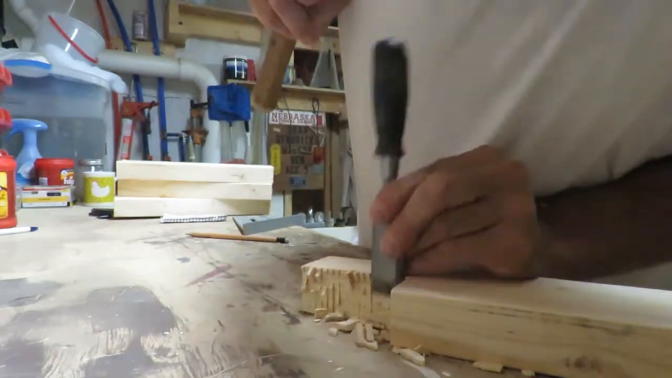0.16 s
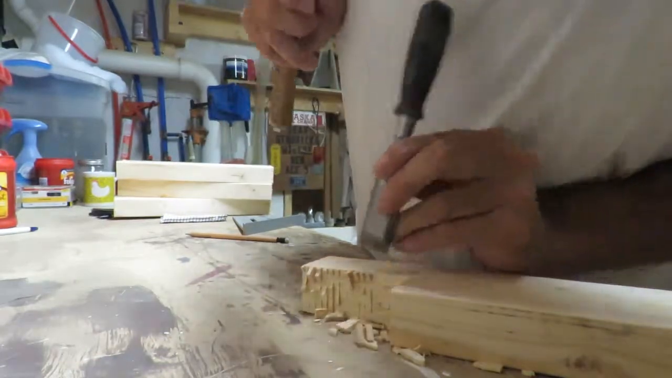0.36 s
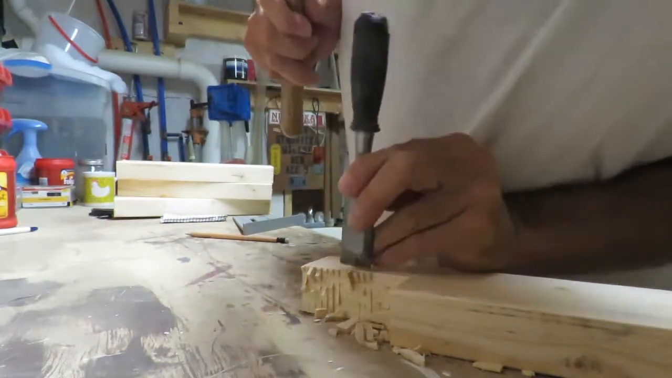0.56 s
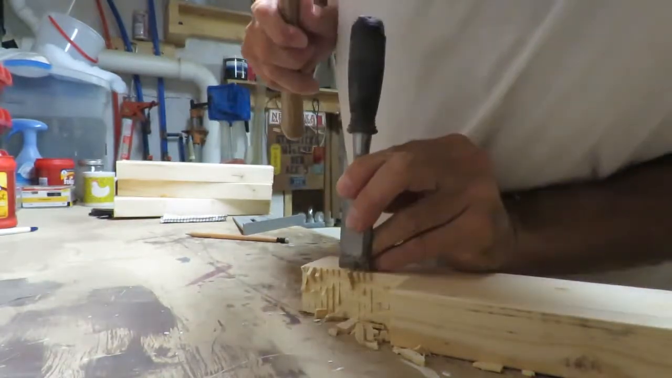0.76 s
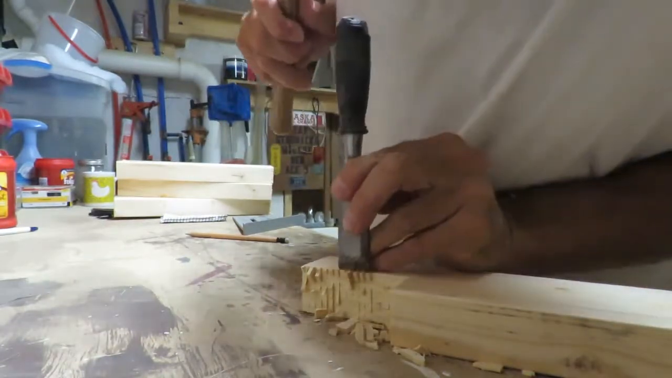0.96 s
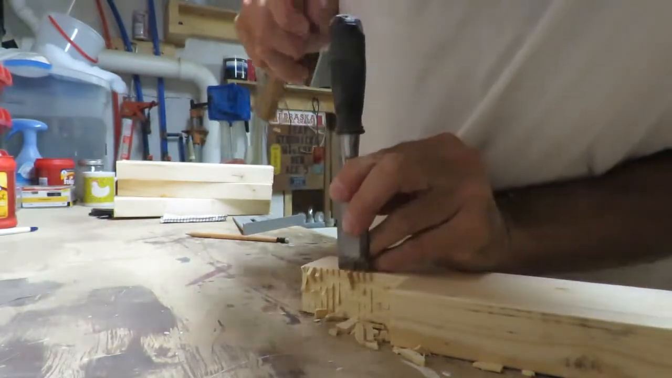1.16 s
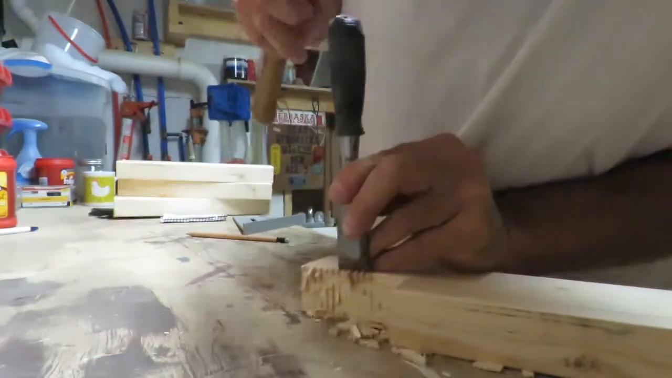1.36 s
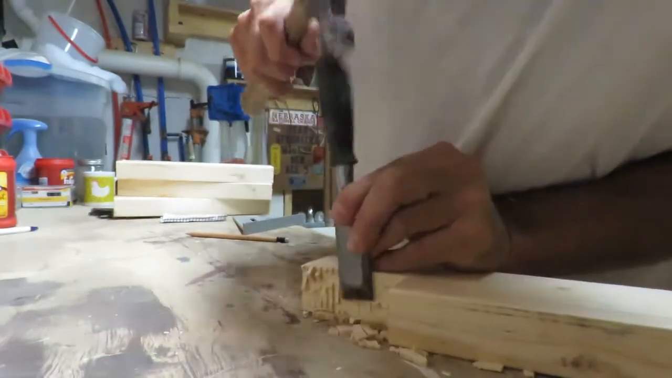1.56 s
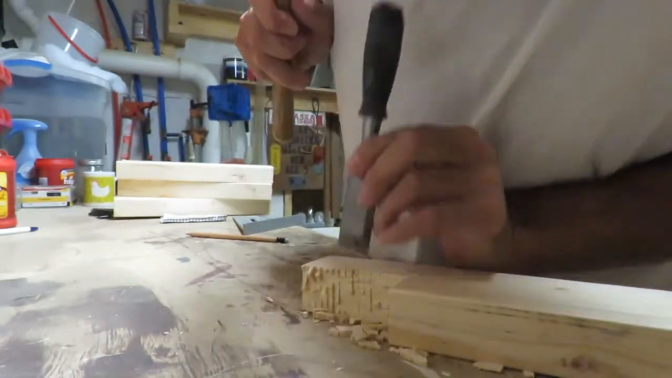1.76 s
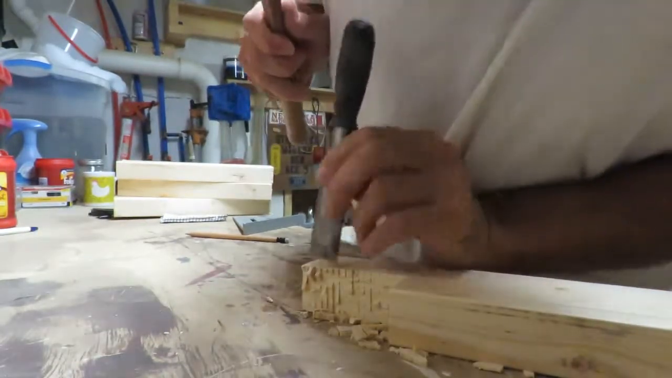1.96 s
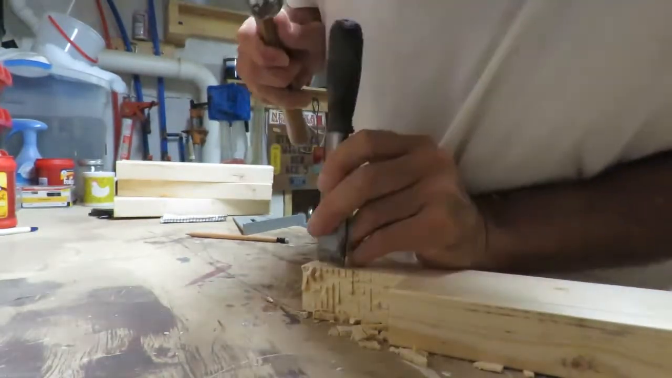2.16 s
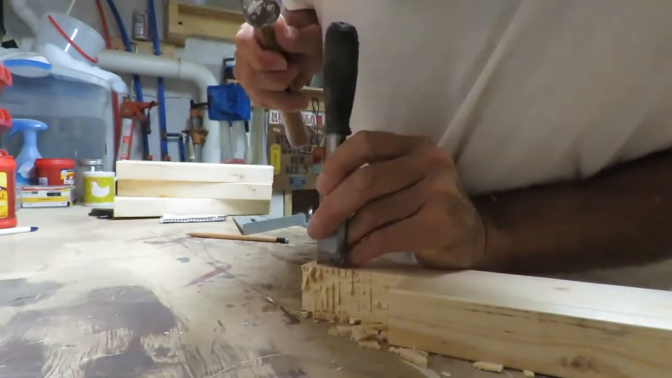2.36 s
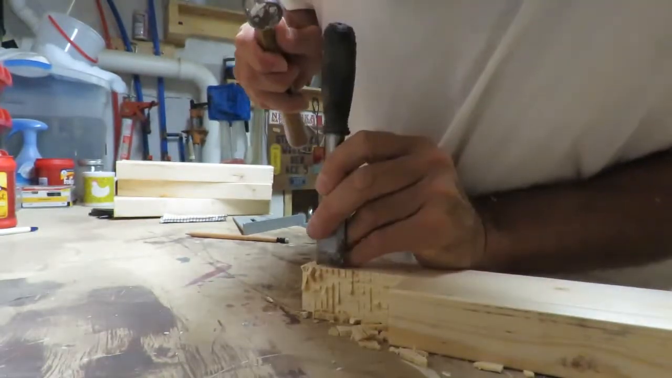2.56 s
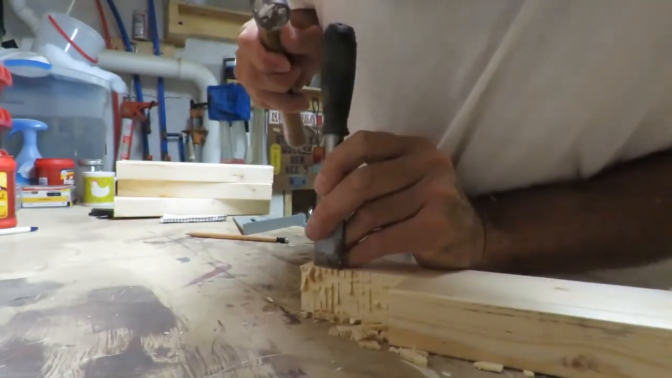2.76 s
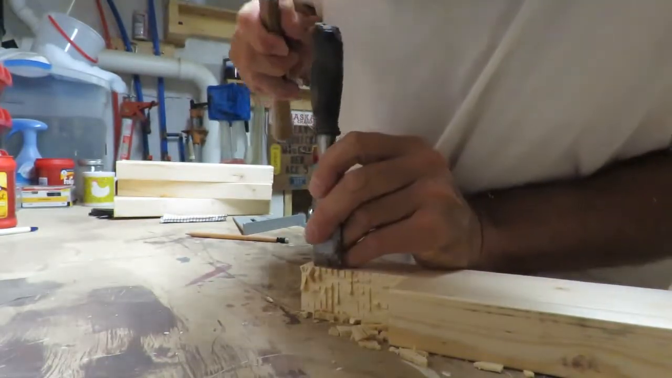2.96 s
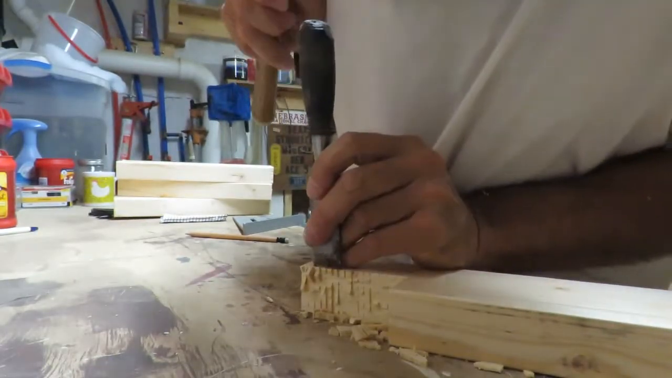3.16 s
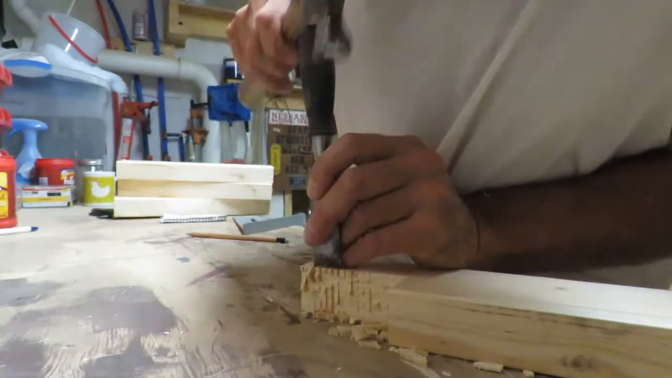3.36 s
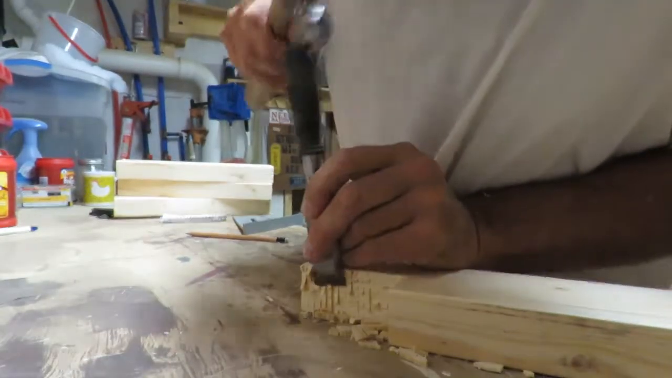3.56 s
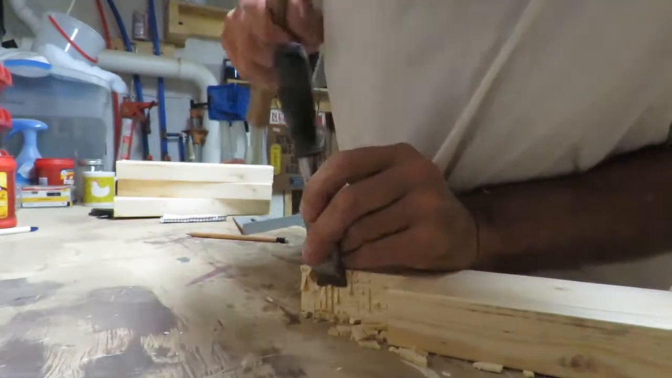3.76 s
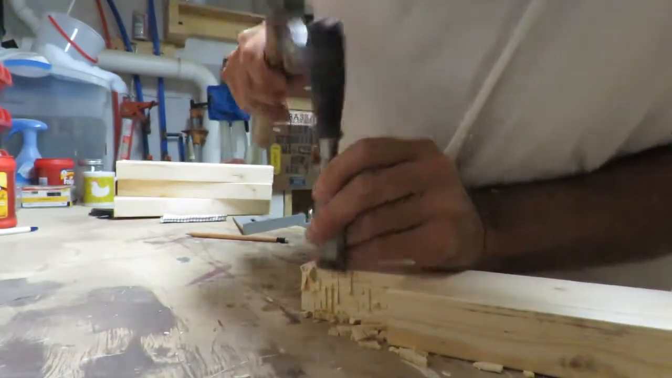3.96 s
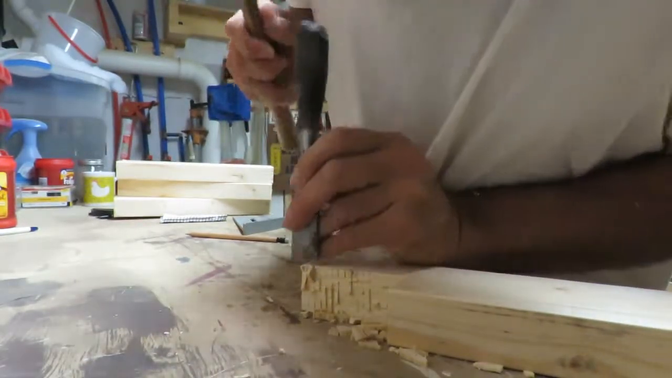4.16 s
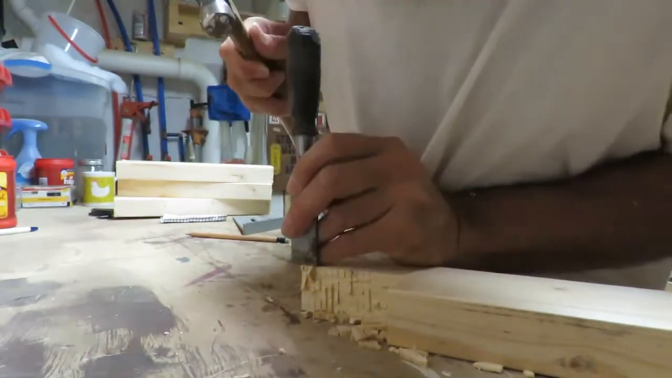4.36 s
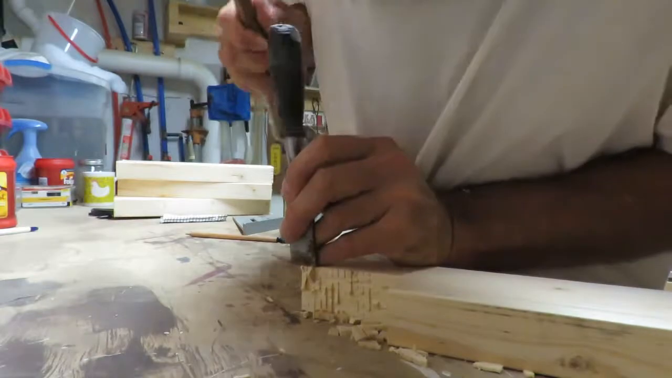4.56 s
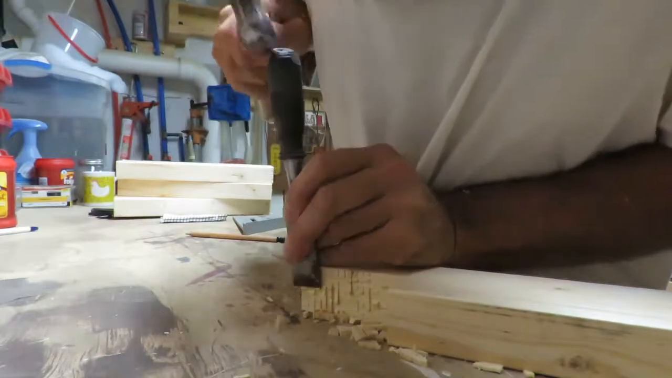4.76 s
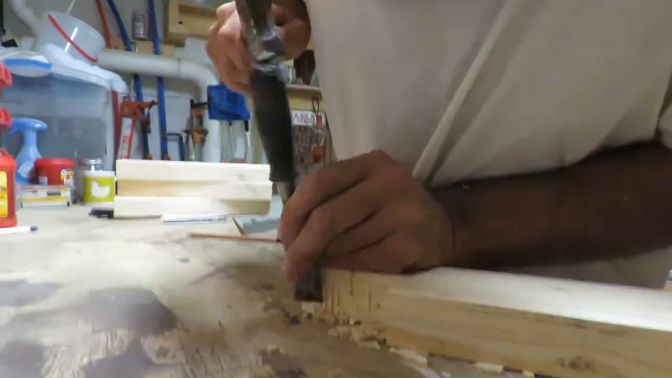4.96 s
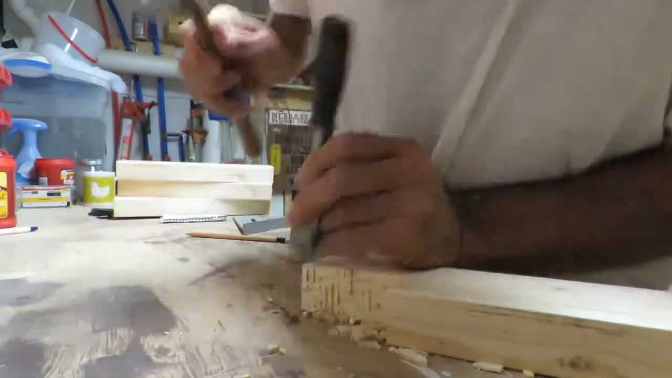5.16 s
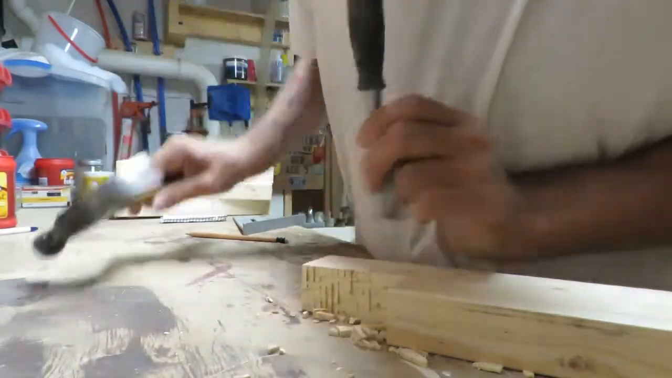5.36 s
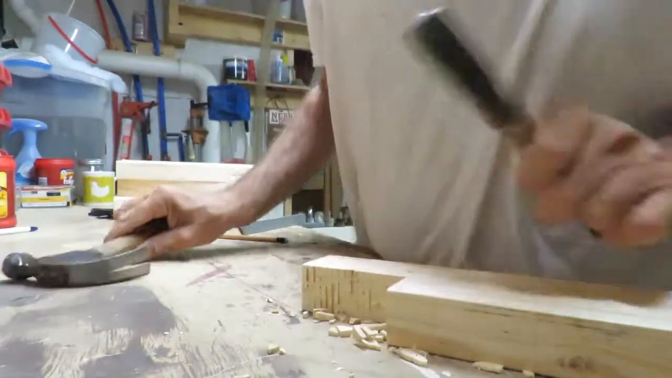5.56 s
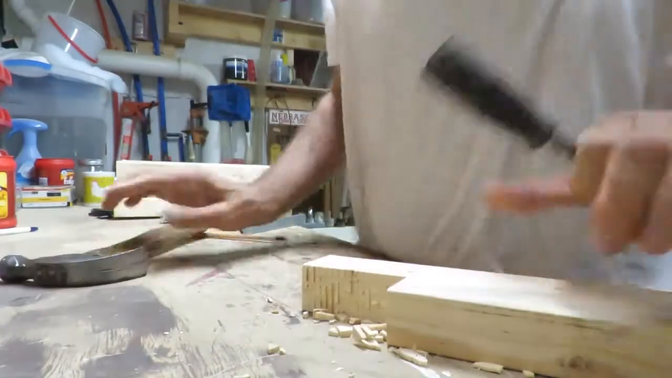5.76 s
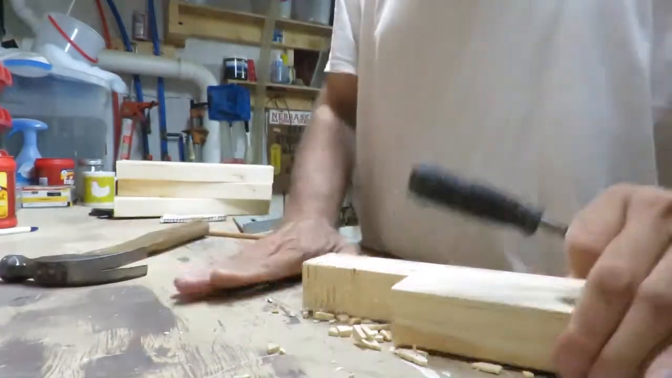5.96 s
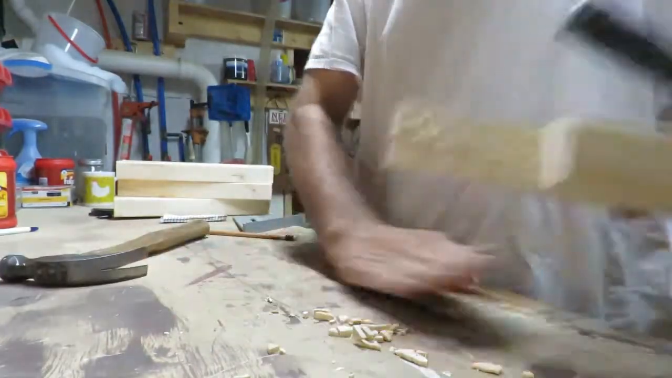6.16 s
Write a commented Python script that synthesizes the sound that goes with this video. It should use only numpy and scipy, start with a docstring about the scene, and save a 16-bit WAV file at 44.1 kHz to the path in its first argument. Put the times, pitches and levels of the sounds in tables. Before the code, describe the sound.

Close up in a small workshop with a steady low rumble, a chisel is hammered into wood in short, irregular groups. Each hit is a dry knock that mixes a bench thud, a steel click and cracking fibres, with soft bumps in the gaps as the blade is reset. Near the end the hammer is laid down and rocks to rest, followed by a few wooden knocks as the board is pushed and lifted.

```python
"""At a workshop bench, a hammer drives a chisel into a board, close to a pair of microphones.
Each impact excites the damped modes of bench, board and blade, while crushed and splintering fibres
add bursts of noise. At the end the hammer is laid down and the loose board is knocked about.
Short reflections, a rustle of arms and the room's rumble surround the work; an automatic gain control
ducks everything after loud blows and lets the rumble swell back."""
import sys
import numpy as np
from scipy import signal
from scipy.fft import rfft, irfft, next_fast_len
from scipy.io import wavfile
from scipy.ndimage import uniform_filter1d, minimum_filter1d

SR = 44100
rng = np.random.default_rng(int(sys.argv[2]) if len(sys.argv) > 2 else 0)


def wrap_up_sound(samples):
    """Save the sound to the file named by the first command line argument, as 16-bit audio."""
    columns = np.atleast_2d(samples).T
    # keep every value between -1 and 1, then stretch to whole-number steps
    tamed = np.clip(columns, -1, 1)
    steps = np.round(tamed * 32767).astype(np.int16)
    wavfile.write(sys.argv[1], SR, steps)


N = 277653
LEAD = 300  # samples before each contact


def contact(level_db, frame_db, steel_db, splinter_db, chatter_s, blade_hz, board_hz,
            focus_db, crunch_db, top_db):
    """Impact excitation: an impulse, uneven slips and grinding drive bench, board and blade."""
    t = (np.arange(8000) - LEAD) / SR
    fading = np.exp(-np.maximum(t, 0) / chatter_s) * (t > 0)
    slips = .5 * rng.standard_normal(len(t)) * (rng.random(len(t)) < 2500 / SR) * fading
    grind = gain_of(-28 - 60 * abs(t) / .11) * rng.standard_normal(len(t)) * (t > 0)
    knock = slips + (t == 0)
    push = knock + .12 * grind
    crack = gain_of(splinter_db) * splinters(t, knock, tilt_db=min(-16.5 + .3 * splinter_db, 0))
    lightness = 1 / (1 + gain_of(2 * (frame_db + 7.5)))  # light contacts favour higher bench modes
    bench = bench_thud(.4 * slips + (t == 0), frame_db, top_db, spot_hz=275 * (1 + .47 * lightness))
    board = board_ring(push, board_hz) + gain_of(crunch_db) * crunch(t, grind, slips)
    steel = gain_of(steel_db) * (blade_ring(push, blade_hz, focus_db) + crack)
    return gain_of(level_db) * (bench + board + steel)


def bench_thud(push, frame_db, top_db, spot_hz):
    """Radiation by acceleration: the top sounds as its change of speed; the frame swings back later."""
    # Modes of frame and top. Each row: frequency in Hz, relative level in dB, 60 dB decay time in seconds.
    frame_modes = [(117.7, -19, 0.01), (157.3, 1, 0.094), (180.8, 0.5, 0.086)]
    top_modes = [(213, -7, 0.049), (275, -4, 0.042), (328.5, -9, 0.027), (408.3, -15.5, 0.039)]
    shove = np.diff(softened(np.roll(push, 30), .00055), prepend=0)
    swing = -softened(np.roll(push, 110), .0001)
    frame = ring(frame_modes, swing, spot_hz=146, focus_db=4.5, vary_db=5.5, detune=.019)
    top = ring(top_modes, shove, spot_hz, focus_db=12, vary_db=3, detune=.0034)
    return gain_of(frame_db) * frame + gain_of(top_db) * top


def board_ring(push, spot_hz):
    """Mode splitting: uneven wood turns each resonance into three close partials."""
    # Each row: frequency in Hz, relative level in dB, 60 dB decay time in seconds.
    modes = [(500, -1, .028), (580, -5, .022), (665, -5, .022), (760, -2, .022), (850, -3, .022),
             (935, -1, .022), (1050, -2, .022), (1205, -4, .02), (1350, -5, .018)]
    return ring(modes, softened(push, .000041), spot_hz, focus_db=11.5, vary_db=2, detune=.047, count=3)


def blade_ring(push, spot_hz, focus_db):
    """Damping: the hand on the blade shortens the ring of its steel modes."""
    # Each row: frequency in Hz, relative level in dB, ungripped 60 dB decay time in seconds.
    modes = [(1490, -2, .016), (1620, -2, .016), (1770, -2, .02), (1950, -4, .018), (2083, -1, .024),
             (2250, -1, .022), (2500, -5, .015), (2770, -8, .013), (3112, -8, .014), (3400, -9, .012),
             (3700, -5, .015), (4200, -6, .012), (4600, -6, .016), (5200, -9, .012)]
    gripped = np.multiply(modes, [1, 1, .94])
    force = softened(push, .00005)
    return ring(gripped, force, spot_hz, max(focus_db, 0), vary_db=4, detune=.032, count=3)


def crunch(t, grind, slips):
    """Direct radiation: fibres crushed by the edge give off mid-range noise."""
    # Each row: frequency in Hz, gain in dB.
    spectrum = [(200, -24), (450, -1), (800, 9), (1400, 12), (2500, 3.5), (4500, -11), (7000, -21.5),
                (16000, -45)]
    envelope = gain_of(-60 * abs(t)) * np.clip(t / .0056, 0, 1)
    return colour(grind * envelope + .076 * slips, spectrum)


def splinters(t, knock, tilt_db):
    """Fracture noise: a quick break, then fibres tearing; heavy splintering is tilted less."""
    # Each row: frequency in Hz, relative gain in dB before the tilt of tilt_db per octave.
    spectrum = [(4000, -22.5), (5500, -12.5), (8000, -11), (11000, -13.5), (13500, -14), (16000, -40.5)]
    burst = gain_of(-60 * abs(t) / .022) + gain_of(-13.5 - 60 * abs(t) / .074)
    onset = 1 - np.exp(-np.maximum(t, 0) / .0029)
    fibres = .093 * rng.standard_normal(len(t)) * burst * onset
    tilted = [(hz, db + tilt_db * np.log2(hz)) for hz, db in spectrum]
    return peaked(colour(.045 * knock + fibres, tilted))


def snap(db, tilt_db, length_s, fizz_db):
    """Broadband transient: steel bites or wood snaps in a burst of noise, then splinters fizz."""
    t = (np.arange(6000) - LEAD) / SR
    pulse = np.exp(-(4 * t / length_s - 2) ** 2)
    fizz = gain_of(fizz_db - 60 * t / .27) * np.clip(t / .0042, 0, 1)
    burst = rng.standard_normal(len(t)) * (pulse + fizz)
    spectrum = [(700, -3 * tilt_db - 12), (2000, -2 * tilt_db), (16000, tilt_db)]
    return gain_of(db) * peaked(colour(burst, spectrum))


def ping(db, hz, t60, slide):
    """Damped oscillation: one faint high partial sinks in pitch as it dies."""
    t = np.arange(5000) / SR
    envelope = gain_of(db - 60 * t / t60) * (1 - np.exp(-t / .0022))
    return envelope * np.sin(2 * np.pi * hz * t * (1 - slide * t))


def ring(modes, push, spot_hz, focus_db, vary_db, detune, count=1):
    """Modal superposition: a force rings decaying sines, focus_db weaker per octave from spot_hz."""
    t = np.arange(len(push) // 2) / SR
    hz, db, t60 = np.repeat(np.transpose(modes), count, axis=1)[:, :, None]
    db = db - focus_db * abs(np.log2(hz / spot_hz)) + vary_db * rng.standard_normal(hz.shape)
    hz = hz * (1 + detune * rng.standard_normal(hz.shape))
    # Neighbouring groups of partials swing in opposite sense.
    sense = (-1.) ** (np.arange(len(hz))[:, None] // count) if count > 1 else 1
    response = (sense * gain_of(db - 60 * t / t60) * np.sin(2 * np.pi * hz * t)).sum(0)
    response *= np.hanning(2 * len(t))[len(t):]
    return peaked(signal.fftconvolve(push, response)[:len(push)])


def softened(push, contact_s):
    """Contact compliance: wood gives, spreading the force in time and dulling its treble."""
    u = np.arange(-LEAD // 2, LEAD // 2) / SR / contact_s
    return signal.fftconvolve(push, np.exp(-u ** 2), "same")


def reflections(x):
    """Reverberation: sparse echoes die band by band and shift as work and arms move."""
    # Each row: frequency in Hz, 60 dB decay time in seconds.
    decay = [(100, 0.27), (260, 0.18), (700, 0.23), (1840, 0.19), (4850, 0.16), (12800, 0.12)]
    # Echoes alike and unlike at the two microphones. Each row: frequency in Hz, gain in dB.
    mid_spectrum = [(100, -11), (400, -10.5), (800, -11), (2000, -11), (5000, -6.5), (12000, -1.5)]
    side_spectrum = [(100, -31.5), (300, -21.5), (600, -18), (1500, -20), (5000, -10.5), (12000, 3)]
    size, shift_hz = SR // 3, .834
    taps = np.zeros((3, 2, size))  # three echo patterns, each with a mid and a side part
    grid = np.arange(60, size - 20, 20)
    arrivals = grid + rng.integers(0, 20, (3, 2, len(grid)))
    np.put_along_axis(taps, arrivals, rng.choice([-1., 1.], arrivals.shape), 2)
    hz, t, spectra = signal.stft(taps, SR, nperseg=256)
    t60 = read(decay, hz)[:, None] * [[[1]], [[.47]]]  # the side part, off near surfaces, dies sooner
    tails = signal.istft(spectra * gain_of(-60 * t / t60), SR, nperseg=256)[1]
    tails /= np.linalg.norm(tails, axis=2)[..., None]
    cycles = shift_hz * np.arange(N) / SR + np.arange(3)[:, None, None] / 3
    crossfade = np.sqrt(2 / 3) * np.cos(2 * np.pi * cycles)
    mid, side = signal.fftconvolve(x * crossfade, tails, axes=2).sum(0)[:, :N]
    return colour(mid, mid_spectrum) + colour(side, side_spectrum) * [[1], [-1]]


def rustle():
    """Amplitude-modulated noise: a bright rustle swells and fades as the arms move."""
    # Each row: time in seconds, level in dB.
    levels = [(5.05, -83), (5.1, -70), (5.17, -65), (5.218, -77.5), (5.33, -60), (5.42, -74.5), (5.6, -90),
              (6.259, -86), (6.29, -58)]
    times, db = np.transpose(levels)
    spectrum = [(800, 4.5), (3000, .5), (9000, -3), (13000, -4), (16000, -31)]
    noise = colour(rng.standard_normal((2, N)), spectrum)
    return noise / noise.std() * gain_of(np.interp(np.arange(N) / SR, times, db, left=-130))


def room_air():
    """Partly coherent noise: the shop's rumble is alike on both sides, its highest hiss is not."""
    # Each row: frequency in Hz, relative spectral density in dB.
    spectrum = [(15, -41), (28, -39), (58, -13), (92, -8), (114, -0.5), (166, 0), (270, -7.5), (463, -23),
                (840, -21), (1230, -31), (1740, -29.5), (2220, -34.5), (3720, -37.5), (8000, -54),
                (10400, -54), (13600, -61), (16000, -85)]
    # Each row: frequency in Hz, left-right correlation.
    coherence = [(60, 1.0), (180, 0.99), (550, 0.92), (1650, 0.94), (4970, 0.83), (15000, 0.058)]
    # Faint steady whistles. Each row: frequency in Hz, height above the hiss in dB, width in Hz.
    whines = [(10320, 7, 100), (13650, 10, 90)]
    frames, hz = N // 256 + 5, np.fft.rfftfreq(1024, 1 / SR)
    a, b, c, d, drift = rng.standard_normal((frames, 513, 5)).T
    drift = uniform_filter1d(uniform_filter1d(drift, 8, 0), 12, 1)  # patches of the spectrum waver
    alike = read(coherence, hz)[:, None]
    left = a + 1j * b
    right = alike * left + np.sqrt(1 - alike ** 2) * (c + 1j * d)
    whines_db = sum(db * np.exp(-((hz - f) / width) ** 2) for f, db, width in whines)
    gain = gain_of((read(spectrum, hz) + whines_db)[:, None] + 1.4 * drift / drift.std())
    air = signal.istft(np.array([left, right]) * gain, nperseg=1024, noverlap=768)[1][:, :N]
    return gain_of(-39.5) * air / air.std()


def gain_of(db):
    """Decibels as an amplitude ratio."""
    return 10 ** (np.asarray(db) / 20)


def read(points, hz):
    """Interpolation of a table along logarithmic frequency."""
    f, value = np.transpose(points)
    return np.interp(np.log(hz + 1), np.log(f + 1), value)


def colour(x, points):
    """Zero-phase filtering by a table of frequency in Hz and gain in dB."""
    size = next_fast_len(x.shape[-1])
    gain = gain_of(read(points, np.fft.rfftfreq(size, 1 / SR)))
    return irfft(rfft(x, size) * gain, size)[..., :x.shape[-1]]


def peaked(x):
    """Normalisation to a peak of 1."""
    return x / (abs(x).max() + 1e-12)


def add(mix, start_s, sound):
    """Superposition of a sound on the mix from start_s on."""
    part = mix[round(start_s * SR):][:len(sound)]
    part += sound[:len(part)]


def scene():
    """Superposition of direct sound, echoes and background; level and phase place the contacts."""
    # Four contact tables. Each row: start in seconds, board level in dB, frame and steel in dB re board,
    # splinters in dB re steel, chatter time in seconds, favoured blade and board frequencies in Hz,
    # blade focus in dB per octave, crunch and bench top in dB re board.
    blows = [(0.0185, -4.5, 5, -5.5, 0, 0.0065, 2400, 605, -4, 8.5, 6.5),
             (1.246, -7.5, 9, -4.5, -28, 0.0038, 1510, 877, 4, 19, 8.5),
             (1.4945, 5, -5.5, -13.5, -12, 0.0035, 3050, 480, 22, 17, 1.7),
             (3.3388, -18.5, -3.5, 6.5, -50, 0.0024, 2220, 560, 19.5, 18.5, 5.5),
             (3.5992, -9.5, -1, -3, -11, 0.0084, 1810, 555, 0, 21.5, 5),
             (3.8483, -15.5, 4, 0, -21, 0.0026, 2340, 690, 7.5, 17, 6),
             (4.7472, -13.5, 2, -5.5, -5, 0.0029, 1760, 530, 9, 13, 6.5),
             (5.005, -15.5, -14, -1, -3, 0.0081, 1950, 960, -3, 13, 1.5)]  # hammer on the chisel handle
    rebounds = [(0.0255, -9.5, -1, -16, -20, 0.0024, 2400, 796, 6, 15.6, 9),
                (1.295, -23, -3, -10, -35, 0.0048, 1490, 500, 8.2, 20, -1),
                (1.3342, -26, -36, -4.5, -16, 0.018, 1790, 1050, 3.8, 21, -17),
                (1.402, -39.5, -9, 3, -16, 0.01, 1980, 1000, 5.6, 27, -8),
                (1.454, -42, -21, 1.5, -16, 0.0044, 1880, 1050, 7.6, 11, -13),
                (1.506, -7.5, -3, -3, -27, 0.0013, 1660, 930, 14, 7.4, -2.5),
                (1.5196, -6, 13, -1.5, -17.5, 0.012, 1600, 920, 6.4, 15, 4.5),
                (1.558, -18, -4, -3, -6.5, 0.0053, 1610, 826, 4.3, 23, 5.5),
                (3.3835, -17, 0.5, -12.5, -10, 0.006, 3070, 490, 6.1, 3.2, 1.5),
                (3.422, -38, -3, -19, -30, 0.0023, 1900, 800, 8, 8, -1),
                (3.4336, -29.5, -12, -11.5, -43, 0.0034, 2090, 650, 16, 6.2, -3),
                (3.628, -25.5, 13, -30, -11, 0.0027, 2100, 500, 6, 5, 7),
                (3.6447, -32, -1, 9, -37, 0.0017, 2130, 680, 22, 16, -2.2),
                (3.8724, -21, -20, 0.5, -24, 0.0016, 2010, 566, 8.1, 12, -17),
                (5.0157, -18.5, -6, -9.5, -3, 0.0081, 2040, 970, 4.3, 8.1, -2.5),
                (5.0235, -19, -11, -16, -12, 0.0027, 2200, 950, 5, 5.8, -7.5),
                (5.036, -35.5, 16, -8, -15, 0.003, 1700, 710, 5, 12, 2)]  # hammer, board and chips bouncing after a blow
    hammer_drops = [(5.4837, -14, 5, -8, -55, 0.0015, 1474, 520, 40, 12, 8),
                    (5.496, -28, 3, -7, 0, 0.018, 2400, 800, 2.5, 9, 10),
                    (5.583, -14.5, -18, -28, -23, 0.00094, 1690, 600, 12, -3, -1.5),
                    (5.591, -21, -7, -19, -22, 0.0019, 1690, 600, 8, 0, 1.2),
                    (5.6067, -6.5, -3, -6, -45, 0.0015, 1620, 700, 15.4, 8.5, 3),
                    (5.618, -23.5, -9, -14, -5, 0.0061, 2400, 650, 2.5, 16, 3),
                    (5.6578, -10.5, -17, -21, -30, 0.0016, 1800, 700, 8.9, -1, -1.8),
                    (5.6986, -19, -3, -31, -29, 0.0014, 1630, 700, 8, -7, 2.5)]  # the hammer laid down, rocking to rest
    board_knocks = [(5.766, -5.5, -11.5, -13, -1.5, 0.0057, 3840, 900, 15, 7.7, -1.2),
                    (5.798, -38, -22, -0.5, 1, 0.008, 4000, 950, 2.5, 21, 2),
                    (5.8362, -22.5, -6, -0.5, -35, 0.0026, 2040, 890, 3.4, 26.4, 7),
                    (5.8844, -29.5, -23, 1, -24, 0.0098, 1790, 800, 13, 16, -3),
                    (5.915, -37, -3, 1.5, -27, 0.0078, 1660, 700, 13, 14, 9),
                    (5.972, -6.5, -28, -5.5, -52, 0.0052, 1770, 895, 24, 11, -9),
                    (5.987, -18.5, -25, -1, -42, 0.0035, 1760, 1010, 22, 8, -5),
                    (6.011, -15, -15, -7, -40, 0.0047, 1760, 960, 54, 9, -2.2)]  # the loose board pushed and lifted
    # The edge set down softly. Each row: start in seconds, frame and bench top levels in dB.
    edge_sets = [(0.7183, -21.5, -56), (2.291, -25, -56), (4.259, -15.5, -20.5), (4.334, -24.5, -51.5),
                 (5.177, -30.5, -25.5)]
    # Each row: start in seconds, level in dB, frequency in Hz, 60 dB decay time in seconds,
    # half the fractional fall in pitch per second.
    pings = [(0.028, -24, 4650, 0.033, 0.0081), (0.235, -48, 11000, 0.041, 2.8),
             (4.569, -54, 12100, 0.011, 1.5), (5.012, -33, 4510, 0.063, .01),
             (5.772, -38, 4540, 0.096, .01), (5.978, -41, 4580, 0.047, .01),
             (5.617, -36, 5850, 0.02, 0.013)]
    # Each row: start in seconds, level in dB, treble tilt in dB per octave, length in seconds,
    # fizz in dB re the burst.
    dry_cracks = [(0.0153, -10.5, -6, 0.0039, -26), (1.2436, -41.5, 1, 0.0032, -4.5),
                  (1.4925, -30, -2.5, 0.003, -14), (1.497, -31.5, -0.6, 0.0036, -12),
                  (1.52, -29.5, -3, 0.0025, -11.5), (3.383, -39, -1.5, 0.0042, -16),
                  (3.599, -26, 2, 0.0025, -22), (3.6007, -30, 0, 0.0035, -15), (3.851, -29, 1, 0.0028, -21),
                  (3.854, -42.5, 0.6, 0.003, -19), (4.745, -25.5, -5.5, 0.0078, -16),
                  (5.0032, -27, -5, 0.0019, -14.5), (5.4828, -29, -14.5, 0.00196, -21),
                  (5.603, -22, -13, 0.0023, -21), (5.764, -34, -10, 0.003, -14),
                  (5.769, -39, -12, 0.004, -12), (5.887, -40, -10, 0.0026, -16),
                  (5.9625, -34, -22, 0.0017, -16)]
    work, side, snaps = np.zeros((3, N))
    # The left is louder by the share lean and leads by lead_rad.
    for rows, lean, lead_rad in [(blows, .03, .17), (rebounds, .03, .17),
                                 (hammer_drops, .02, .45), (board_knocks, .02, .22)]:
        for start, *row in rows:
            sound = contact(*row)
            add(work, start - LEAD / SR, sound)
            add(side, start - LEAD / SR, lean * sound - lead_rad / 2 * signal.hilbert(sound).imag)
    impulse = 1. * (np.arange(8000) == LEAD)
    for start, *row in edge_sets:
        add(work, start - LEAD / SR, bench_thud(impulse, *row, spot_hz=275))
    for start, *row in pings:
        add(work, start, ping(*row))
    for start, *row in dry_cracks:
        add(snaps, start - LEAD / SR, snap(*row))
    side = signal.lfilter(*signal.butter(1, 330, "high", fs=SR), side)  # bass reaches both sides alike
    work = signal.lfilter(*signal.butter(2, 70, "high", fs=SR), work)  # a small bench has no deep bass
    direct = work + side * [[1], [-1]] + snaps * gain_of([[-.8], [.8]])
    return direct + reflections(work + snaps) + room_air() + rustle()


def record(dry):
    """Automatic gain control: fast fall, hold and slow recovery, then soft clipping and a band limit."""
    threshold_db, attack_s, hold_s, recovery_db_per_s, ceiling = -25, .0038, .15, 9.04, .256
    sensed = signal.lfilter(*signal.butter(1, 400, "high", fs=SR), dry.mean(0))
    power = signal.lfilter(np.ones(180) / 180, 1, sensed ** 2)  # mean of the last 4 ms
    over_db = 10 * np.log10(power + 1e-12) - threshold_db
    over_db[0] = 14  # earlier blows have left the gain turned down
    hold = round(hold_s * SR)
    held_db = -minimum_filter1d(-np.r_[np.full(hold, -99.), over_db], hold)[hold // 2:][:N]
    recovery_db = np.arange(N) * recovery_db_per_s / SR
    duck_db = np.maximum(np.maximum.accumulate(held_db + recovery_db) - recovery_db, 0)
    step = 1 / (attack_s * SR)
    smooth_db = signal.lfilter([step], [1, step - 1], duck_db - duck_db[0]) + duck_db[0]
    ducked = dry / gain_of(smooth_db)
    clipped = ceiling * np.sqrt(np.tanh((ducked / ceiling) ** 2)) * np.sign(ducked)
    lowpass = signal.firwin(255, 16200, window=("kaiser", 9), fs=SR)
    return signal.oaconvolve(clipped, lowpass[None], "same")


dry = scene()
out = record(dry)
wrap_up_sound(out)
```